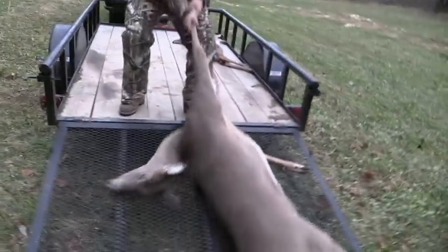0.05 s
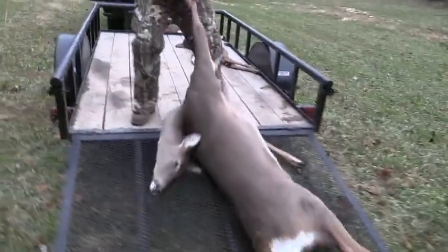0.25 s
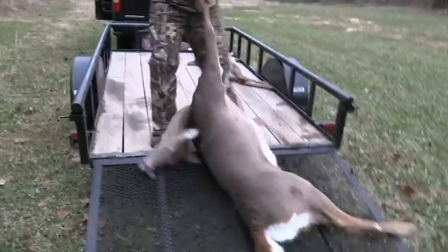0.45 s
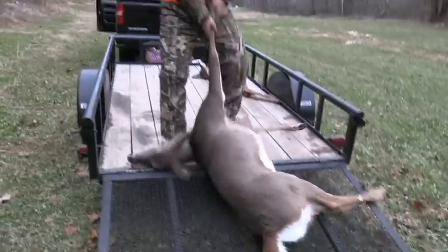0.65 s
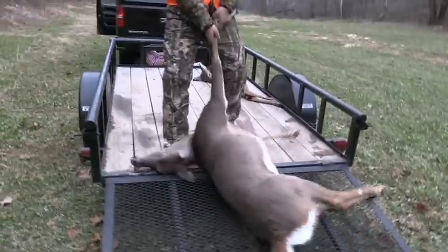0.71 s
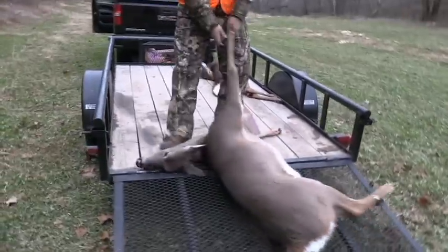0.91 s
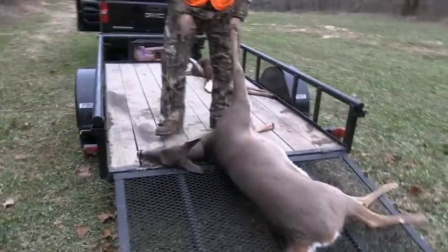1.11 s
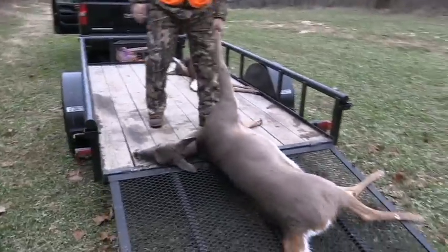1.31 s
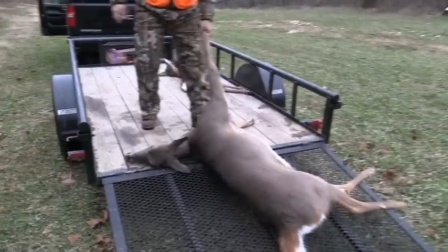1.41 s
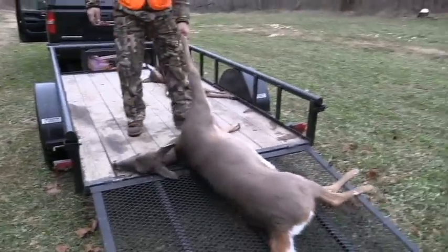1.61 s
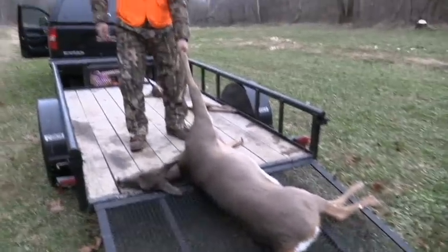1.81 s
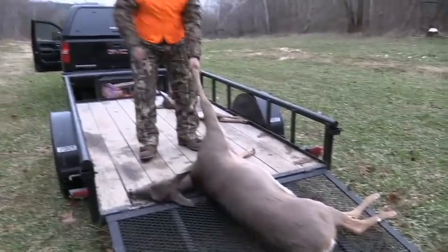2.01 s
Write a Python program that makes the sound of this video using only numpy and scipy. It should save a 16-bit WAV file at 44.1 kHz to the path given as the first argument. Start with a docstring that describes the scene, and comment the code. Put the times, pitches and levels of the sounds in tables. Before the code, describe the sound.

A heavy carcass rasps up a metal mesh ramp with wiry clicks and low shudder, cracks and thuds hard onto the plank deck, then fur brushes and isolated hollow knocks follow; close, dry, quiet open air.

```python
"""A heavy carcass is hauled up a steel mesh ramp onto the plank deck of a trailer, outdoors.
Boots and carcass knock on the deck: noise bands decay fast, then the frame's sines ring on.
The hide rasps over the mesh as snagging grains of noise, with ringing wires and a shuddering ramp.
Fur hisses on the wood as dense fine clicks; boots scuff, wire and grit click, and a hard part
cracks on the deck's edge. Shaped noise makes the ramp's low drone and the faint open air."""
import sys
import numpy as np
from scipy import signal
from scipy.fft import rfft, irfft
from scipy.io import wavfile
from scipy.ndimage import uniform_filter1d

SR = 44100
rng = np.random.default_rng(int(sys.argv[2]) if len(sys.argv) > 2 else 0)


def master_out(mix):
    """Clip the mix to full scale and print it as 16-bit PCM to the path in sys.argv[1]."""
    frames = np.transpose(np.atleast_2d(mix))
    ceiling = np.clip(frames, -1, 1)
    pcm = np.round(ceiling * 32767).astype(np.int16)
    wavfile.write(sys.argv[1], SR, pcm)


N = 92610


def amp(db):
    """Decibels to gain."""
    return 10 ** (np.asarray(db) / 20)


def unit(x):
    """Scales to rms 1."""
    return x / np.sqrt(np.mean(x ** 2) + 1e-20)


def fade(t, t60_s):
    """Exponential decay, 60 dB in t60_s."""
    return amp(-60 * t / t60_s)


def read(points, hz):
    """Reads a spectrum in dB on a log-frequency axis."""
    point_hz, value_db = np.transpose(points)
    return np.interp(np.log(hz + 1), np.log(point_hz + 1), value_db)


def level(points):
    """A level curve as gain per sample."""
    point_s, level_db = np.transpose(points)
    return amp(np.interp(np.arange(N) / SR, point_s, level_db))


def add(mix, start_s, sound):
    """Mixes a sound in at start_s."""
    part = mix[max(round(start_s * SR), 0):][:len(sound)]
    part += sound[:len(part)]


def colour(x, points):
    """Gives a steady sound a spectrum, at rms 1."""
    gain = amp(read(points, np.fft.rfftfreq(N, 1 / SR)))
    return unit(irfft(rfft(x) * gain, N))


def band(x, lo_hz, hi_hz, order=3):
    """Causal Butterworth band-pass."""
    edges_hz = [lo_hz, min(hi_hz, SR / 2 - 100)]
    sos = signal.butter(order, edges_hz, "band", fs=SR, output="sos")
    return signal.sosfilt(sos, x)


def grains(per_s, spread_db):
    """Random tiny clicks, a few of them large."""
    size = amp(spread_db * np.minimum(rng.exponential(1, N), 4.5))
    sign = rng.choice([-1, 1], N)
    return size * sign * (rng.random(N) < per_s / SR)


# Open-air spectrum. Each row: frequency in Hz, relative level in dB.
AIR_SPECTRUM = [(20, -20), (35, -7), (55, 3.5), (90, -3), (173, -11), (450, -17), (700, -11.5), (1100, -22),
                (1900, -21), (3300, -27.5), (8000, -40), (15500, -53)]
AIR_DB = -49


def air():
    """Faint open air: steady noise with a spectrum that falls toward the treble."""
    return amp(AIR_DB) * colour(rng.standard_normal(N), AIR_SPECTRUM)


FIBRES_PER_S, FIBRE_SPREAD_DB = 14000, 2.5
# Scuffs, likely boot soles. Each row: start in seconds, length in seconds, level in dB,
# centre in Hz, width in octaves.
SCUFFS = [(0.908, 0.055, -45.5, 1626, 0.11), (1.238, 0.053, -37, 3200, .6),
          (1.454, 0.033, -41.5, 5700, 0.24), (1.545, 0.063, -43, 520, 0.85),
          (1.798, .22, -54.5, 2480, 0.49)]


def scuffs():
    """Boots shift: short swells of gritty friction, each a resonant band of grains."""
    out = np.zeros(N)
    hz = np.fft.rfftfreq(N, 1 / SR) + 1
    for start_s, length_s, db, centre_hz, width_oct in SCUFFS:
        resonance = 1 / (1 + (np.log2(hz / centre_hz) / width_oct) ** 2)
        grit = unit(irfft(rfft(grains(FIBRES_PER_S, FIBRE_SPREAD_DB)) * resonance, N))
        swell = np.sqrt(np.hanning(int(length_s * SR)))
        add(out, start_s, amp(db) * swell * grit[:len(swell)])
    return out


# Fur sliding over planks. Each row: time in seconds, level in dB.
SLIDE_LEVEL = [(0, -41), (.18, -32.5), (.5, -36.5), (.62, -40.5), (.72, -49.5), (.83, -47), (.88, -44.5),
               (1.0, -44.5), (1.17, -47), (1.27, -43), (1.3, -55.5), (1.33, -53), (1.35, -46.5),
               (1.43, -47.5), (1.48, -42), (1.56, -46), (1.62, -40), (1.66, -59.5), (1.73, -60.5),
               (2.1, -56)]
# Hiss spectrum. Each row: frequency in Hz, relative level in dB.
SLIDE_COLOUR = [(250, -19), (550, -1.5), (1000, -6.5), (2500, -6), (3300, -7), (4500, -6), (6000, -8),
                (7200, -10.5), (9000, -10.5), (12000, -15.5), (15500, -14)]
PATCHY_RMS_DB = 1.5


def slide():
    """Fur brushes the planks: dense grains whose level varies in patches of time and frequency."""
    cells = signal.stft(grains(FIBRES_PER_S, FIBRE_SPREAD_DB), nperseg=512)[2]
    patches = uniform_filter1d(rng.standard_normal(cells.shape), size=7, axis=0)
    patches = unit(uniform_filter1d(patches, size=6, axis=1))
    hiss = signal.istft(cells * amp(PATCHY_RMS_DB * patches), nperseg=512)[1][:N]
    hiss = band(colour(hiss, SLIDE_COLOUR), 660, 13200, order=2)
    return level(SLIDE_LEVEL) * unit(hiss)


# The whole ramp flexes. Each row: time in seconds, level in dB.
DRONE_LEVEL = [(0, -72.5), (.28, -46), (.36, -36), (.45, -31.5), (.58, -39), (.68, -45), (.76, -55),
               (.9, -53), (2.1, -78)]
DRONE_HZ, DRONE_WIDTH_HZ = 75.5, 12.5


def drone():
    """The loaded ramp's lowest resonance: narrow-band noise with its swells evened out."""
    flex = band(rng.standard_normal(N), DRONE_HZ - DRONE_WIDTH_HZ / 2, DRONE_HZ + DRONE_WIDTH_HZ / 2)
    envelope = abs(signal.hilbert(flex))
    return level(DRONE_LEVEL) * unit(flex / np.sqrt(envelope + 1e-9))


def bursts(table, spectrum):
    """Very short bursts of coloured noise that start at once and decay exponentially."""
    out = np.zeros(N)
    t = np.arange(4000) / SR
    for start_s, db, t60_s in table:
        noise = colour(rng.standard_normal(N), spectrum)[:len(t)]
        add(out, start_s, noise * amp(db) * fade(t, t60_s))
    return out


# Small clicks, likely wire and grit. Each row: start in seconds, level in dB, t60 in seconds.
CLICKS = [(0.2358, -26, 0.015), (0.285, -22, 0.011), (0.3006, -17, 0.013), (.324, -20.5, 0.014),
          (.367, -20, 0.051), (.379, -21, .014), (.394, -20.5, 0.026), (.686, -38, .01),
          (0.719, -31.5, .01), (1.222, -37.5, 0.034), (.8635, -39.5, 0.038)]
# Click spectrum. Each row: frequency in Hz, relative level in dB.
CLICK_COLOUR = [(300, -12), (1200, -10), (3200, -3), (4200, 4.5), (5500, -5), (6800, 1), (9000, -8.5),
                (11500, -14.5), (16000, -28)]


def wire_clicks():
    """Snapping wire and grit: small bright bursts."""
    return bursts(CLICKS, CLICK_COLOUR)


# A hard part strikes the deck's edge and rebounds. Each row: start in seconds, level in dB,
# t60 in seconds.
CRACKS = [(.7495, -7.5, .02), (.753, -16.5, 0.016)]
# Crack spectrum. Each row: frequency in Hz, relative level in dB.
CRACK_COLOUR = [(300, -20), (1200, -2.5), (2500, 2), (4300, 1), (7000, -4.5), (10200, -13.5), (11200, -6.5),
                (12300, -5), (13000, -9.5), (16000, -13)]


def edge_cracks():
    """A hard strike and its weaker rebound: broad, bright bursts."""
    return bursts(CRACKS, CRACK_COLOUR)


# Resonances and hollows of the trailer. Each row: frequency in Hz, width in Hz, gain in dB.
PLANKS = [(118, 17, 5), (195.4, 10, -7.5), (247, 62, 2), (292, 17, -3), (357.7, 105, 3), (423, 15, -2.5),
          (502, 60, 4.5), (652, 45, 2), (795, 17, -2), (811, 51, 1.5), (1028, 15, 3.5), (1255, 44, 4.5),
          (1396, 43, 3), (1583, 38, 7), (1766, 20, 10.5), (2257, 62, -0.5)]


def planks(x):
    """The trailer's fixed resonances and hollows colour whatever shakes it, one after another."""
    for hz, width_hz, db in PLANKS:
        b, a = signal.iirpeak(hz, hz / width_hz, fs=SR)
        x = x + (amp(db) - 1) * signal.lfilter(b, a, x)
    return x


# Hide over the mesh. Each row: time in seconds, level in dB before the planks.
RASP_LEVEL = [(0, -54), (.12, -42.5), (.22, -32.5), (.3, -23), (.38, -23.5), (.45, -29), (.52, -39),
              (.6, -45), (.75, -51), (1.1, -54.5), (2.1, -90)]
# Rasp spectrum. Each row: frequency in Hz, relative level in dB per Hz.
RASP_COLOUR = [(150, -48), (250, -20), (324, 3), (385, 1), (635, -9), (1010, -3.5), (1160, -10.5),
               (1270, -6.5), (1760, -15), (1920, -9.5), (3510, -17.5), (4170, -34), (5790, -40),
               (6770, -20), (15500, -50.5)]
# Ringing mesh wires. Each row: frequency in Hz, width in Hz, level relative to the rasp in dB.
WIRES = [(1406, 80, -16.5), (1730, 160, -15), (4180, 180, -11.5), (4680, 140, -20), (6750, 300, -38)]
# The ramp shudders under the load. Each row: time in seconds, level in dB before the planks.
RUMBLE_LEVEL = [(0, -56.5), (.15, -40), (.25, -31.5), (.36, -26.5), (.46, -28.5), (.6, -39.5), (.71, -29.5),
                (.85, -38.5), (1.15, -50), (1.5, -56), (1.6, -45), (1.68, -68), (1.74, -51), (2.1, -55.5)]
# Shudder spectrum. Each row: frequency in Hz, relative level in dB.
RUMBLE_COLOUR = [(20, -45), (55, -20), (88, -14.5), (110, 3.5), (145, -6), (180, 2), (220, 2.5),
                 (290, -5.5), (370, -4), (560, -7), (900, -20), (2500, -55)]
SNAGS_PER_S, SNAG_SPREAD_DB = 5000, 3
SNAG_POWER_DECAY_S = 0.00089  # time constant of a snag's power


def ramp():
    """The hide snags on the mesh in tiny gritty bursts, ringing its wires and shaking the ramp."""
    decay = np.exp(-1 / (SNAG_POWER_DECAY_S * SR))
    power = signal.lfilter([1], [1, -decay], grains(SNAGS_PER_S, SNAG_SPREAD_DB) ** 2)
    snags = np.sqrt(power) * rng.standard_normal(N)
    rasp = band(colour(snags, RASP_COLOUR), 397, 14000, order=2)
    wires = np.zeros(N)
    for hz, width_hz, db in WIRES:
        plucks = grains(SNAGS_PER_S, SNAG_SPREAD_DB)
        wires += amp(db) * unit(band(plucks, hz - width_hz / 2, hz + width_hz / 2, order=1))
    rumble = level(RUMBLE_LEVEL) * colour(snags, RUMBLE_COLOUR)
    return level(RASP_LEVEL) * (rasp + wires) + rumble


# Centres in Hz of a blow's six registers: bass, low-mid, body, knock, clack, treble.
REGISTER_HZ = [130, 280, 550, 950, 1800, 6000]
# Noise bands of a knock. Each row: centre in Hz, own level in dB, length factor on the knock's t60,
# tail level in dB before the blow's ring level, tail t60 in seconds.
DECK = [(77, -10, 1.1, -19, .4), (117.6, -1, 0.86, -21, 0.67), (165, 0.5, 1.35, -19, 0.5),
        (257.4, 0.5, 0.88, -10.5, 0.43), (376.3, 3, 1.14, -21, 0.56), (547, 1, 0.93, -16, .45),
        (832, -5.5, 0.61, -4.5, 0.34), (1270, -3.5, 0.67, -16, 0.47), (1827, -3, 0.48, -20, 0.45),
        (2850, -1.5, 0.53, -17, 0.33), (3970, -1, 0.39, -15, 0.33), (6070, -3, 0.66, -34, .2),
        (9500, -4.5, 0.62, -32, .2), (14000, -10, 0.54, -32, .2)]
# Ringing of frame and ramp. Each row: frequency in Hz, relative level in dB, t60 in seconds.
FRAME = [(143, -13, 0.97), (156.9, -11.5, 0.54), (244, -13, 0.52), (279.7, -8, 0.13), (343.2, -7, 0.36),
         (377, -14.5, 0.54), (400, -16.5, 0.61), (457.5, -12, 0.55), (490, -11, 0.29), (548, -14, 0.52),
         (596, -13, 0.16), (639, -23, 0.36), (826, -15, 0.41)]
BAND_RATIO = 1.23  # band edge to centre
RISE_CYCLES = 0.66
EVENNESS = 0.77  # 0 = natural noise envelope, 1 = flat


def blow(force_db, t60_s, ring_db):
    """A knock levelled by register: planks clatter briefly, the deck reverberates, the frame rings."""
    t = np.arange(SR) / SR
    force = list(zip(REGISTER_HZ, force_db))
    out = np.zeros(SR)
    for hz, own_db, length, tail_db, tail_t60_s in DECK:
        noise = band(rng.standard_normal(2 * SR), hz / BAND_RATIO, hz * BAND_RATIO)
        shake = signal.hilbert(noise[SR:])  # filter settled
        shake = unit(shake.real / (abs(shake) + 1e-9) ** EVENNESS)
        rise = np.sin(np.pi / 2 * np.minimum(t * hz / RISE_CYCLES, 1)) ** 2
        tail = amp(tail_db + ring_db) * fade(t, tail_t60_s)
        decay = np.hypot(fade(t, t60_s * length), tail)
        out += amp(own_db + read(force, hz)) * shake * rise * decay
    ring = np.zeros(SR)
    for hz, db, ring_t60_s in FRAME:
        tone = np.sin(2 * np.pi * (hz * t + rng.random()))
        ring += amp(db + read(force, hz)) * fade(t, ring_t60_s) * tone
    ring_rise = 1 - np.exp(-t / 0.012)
    return out + amp(ring_db) * ring * ring_rise


# Blows on the trailer. Each row: start in seconds, relative level in dB in each of the six registers,
# base t60 of the knock in seconds, ring level in dB.
BLOWS = [(0.2051, -20, -23, -37, -44, -49, -62, 0.036, -10),
         (.361, -33, -21.5, -25, -37, -46, -50, 0.035, -17),
         (.497, -26.5, -15, -21, -39, -50, -71, 0.13, -1.5),
         (.533, -34, -22, -26.5, -38, -44, -60, 0.039, -10),
         (.559, -50, -44, -42, -24, -28.5, -37, .04, -11),
         (0.6401, -34.5, -21, -21, -25.5, -20.5, -50, 0.16, 1),
         (0.6614, -42, -20, -14.5, -40, -35, -60, 0.028, -6),
         (0.7491, -19, -24, -18, -26, -15, -31.5, 0.19, -6.5),
         (.764, -10, -11.5, -13.5, -28, -32, -40, 0.062, -2),
         (.787, -33, -15, -18, -43, -48, -54, 0.12, -3.5),
         (1.2202, -27.5, -26.5, -23.5, -37.5, -45, -45, 0.13, 1.5),
         (1.3902, -18.5, -27.5, -45.5, -43, -57, -67, 0.04, -15),
         (1.7469, -22, -20.5, -14, -16.5, -32, -44, 0.17, -2.5),
         (1.821, -18, -38, -28, -35, -53, -72, 0.095, -7.5)]
SUB_CUT_HZ = 122


def knocks():
    """All blows on the trailer, with the deep bass below SUB_CUT_HZ high-passed away."""
    out = np.zeros(N)
    for start_s, *force_db, t60_s, ring_db in BLOWS:
        add(out, start_s, blow(force_db, t60_s, ring_db))
    return signal.sosfilt(signal.butter(2, SUB_CUT_HZ, "high", fs=SR, output="sos"), out)


SPREAD_DB = -40.5


def scene():
    """Trailer sounds in the middle, the knocks very slightly spread, over faint open air."""
    deck = planks(knocks())
    opposite = np.array([[1], [-1]])  # left, right
    spread = amp(SPREAD_DB) * band(deck, 85, 900, order=2) * opposite
    hits = deck + wire_clicks() + edge_cracks()
    friction = planks(ramp()) + drone() + slide() + scuffs()
    return hits + spread + friction + air()


EDGE_HZ = 16100


def record(dry):
    """Peaks round off softly below 0.95; then a linear-phase low-pass at EDGE_HZ."""
    held = dry / (1 + (dry / .95) ** 6) ** (1 / 6)
    lowpass = signal.firwin(511, EDGE_HZ, window=("kaiser", 9), fs=SR)
    return signal.oaconvolve(held, lowpass[None], "same")


dry = scene()
out = record(dry)
master_out(out)
```